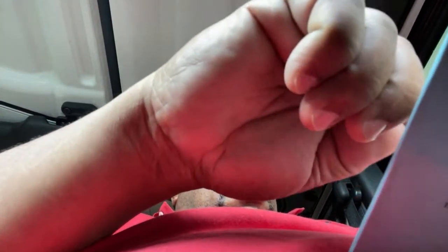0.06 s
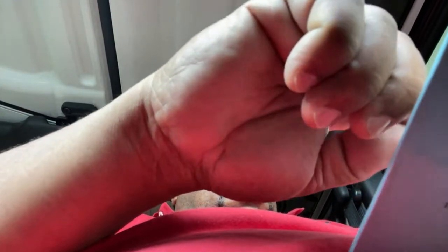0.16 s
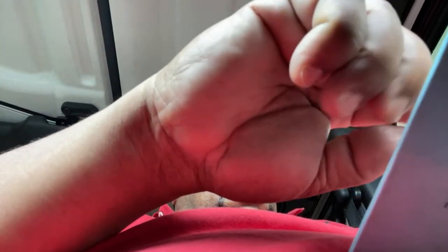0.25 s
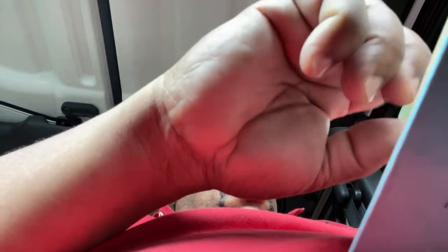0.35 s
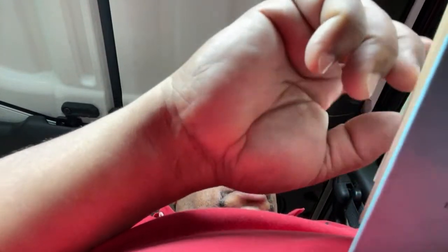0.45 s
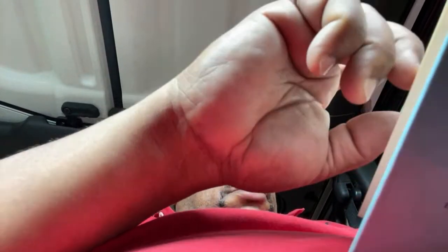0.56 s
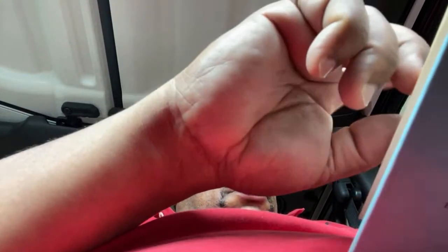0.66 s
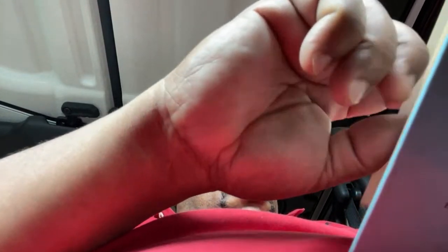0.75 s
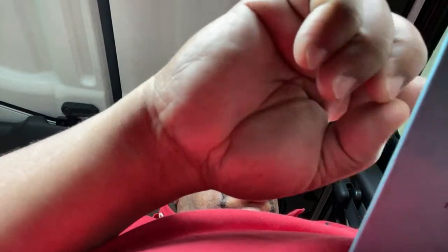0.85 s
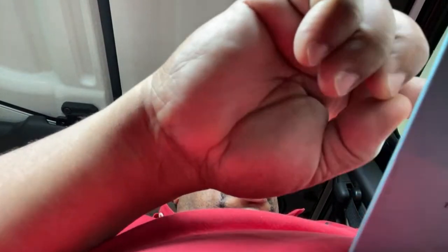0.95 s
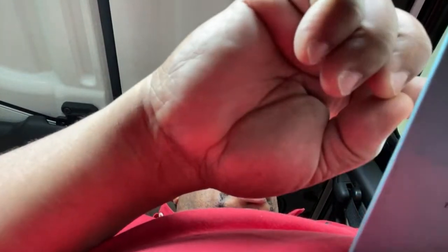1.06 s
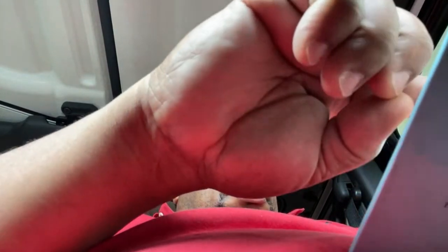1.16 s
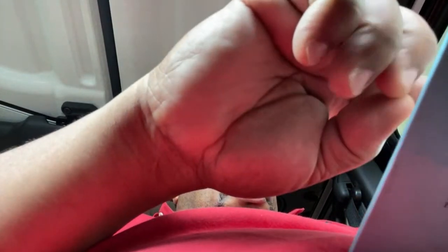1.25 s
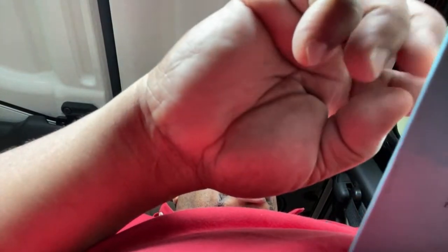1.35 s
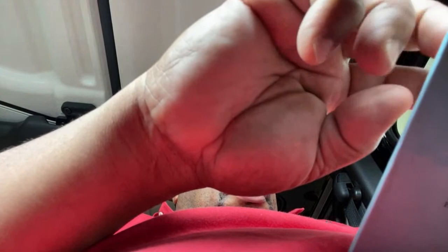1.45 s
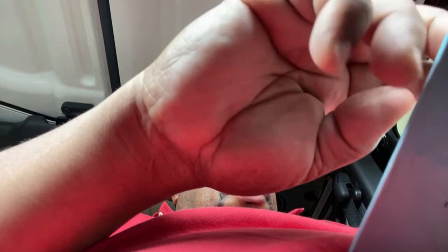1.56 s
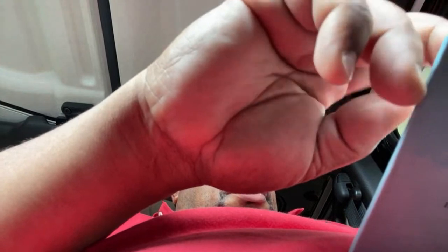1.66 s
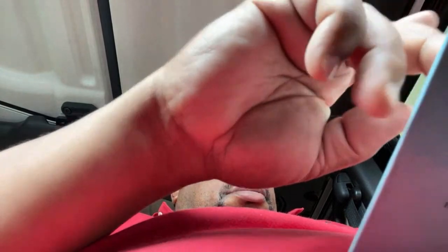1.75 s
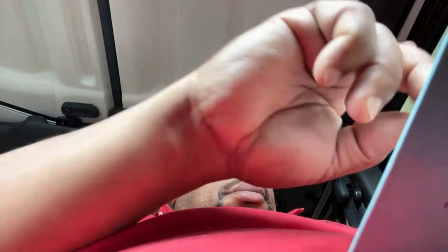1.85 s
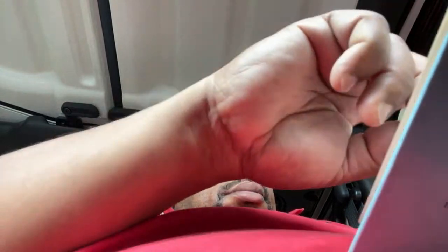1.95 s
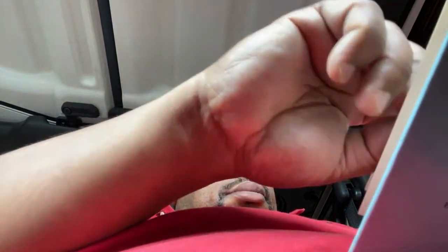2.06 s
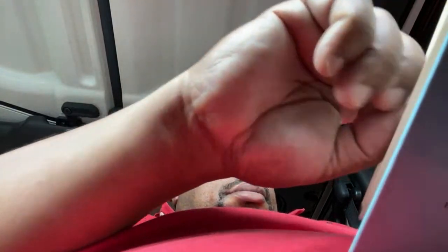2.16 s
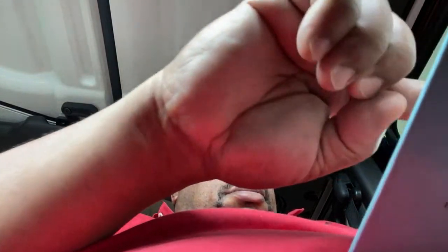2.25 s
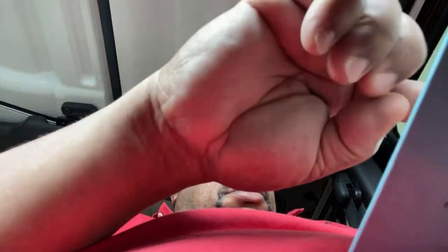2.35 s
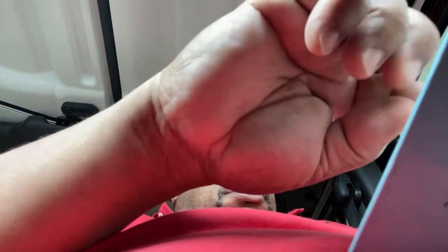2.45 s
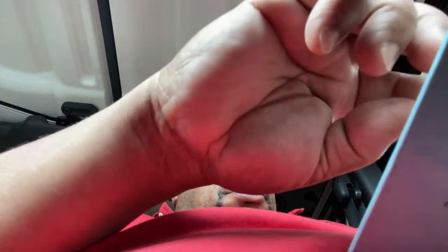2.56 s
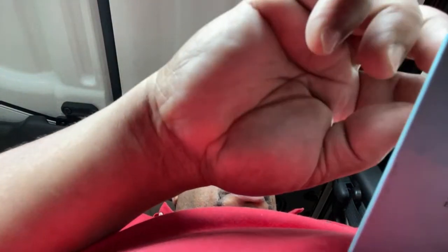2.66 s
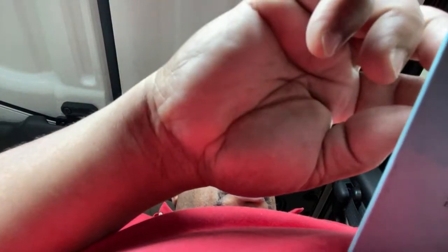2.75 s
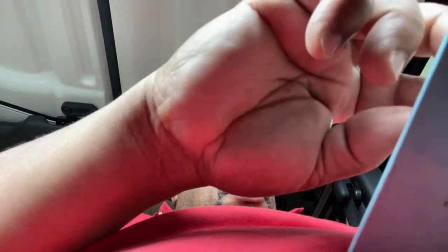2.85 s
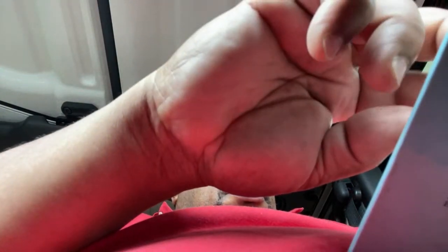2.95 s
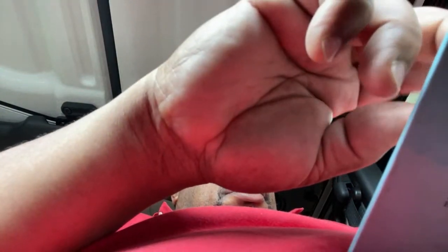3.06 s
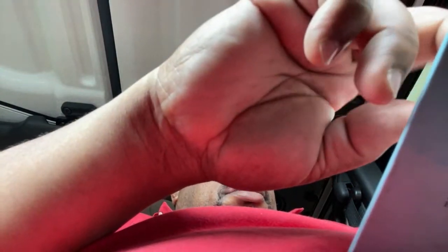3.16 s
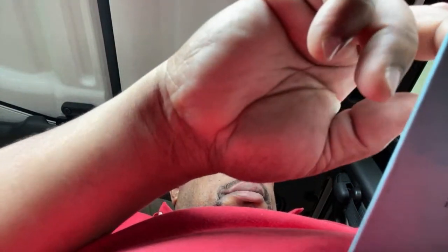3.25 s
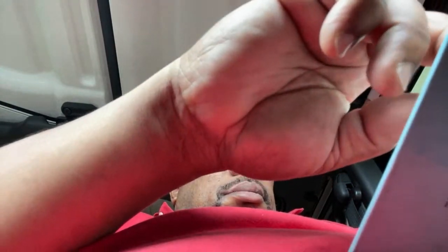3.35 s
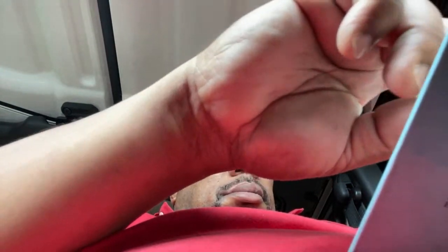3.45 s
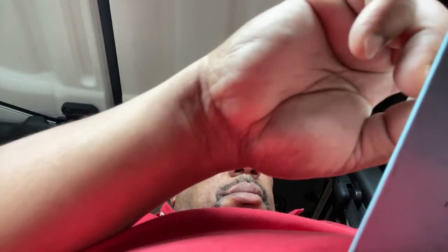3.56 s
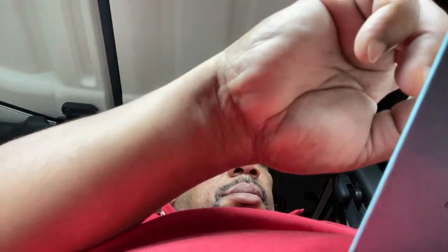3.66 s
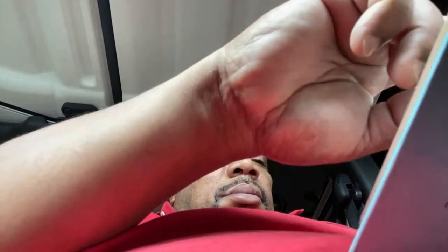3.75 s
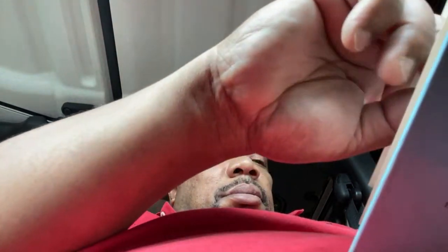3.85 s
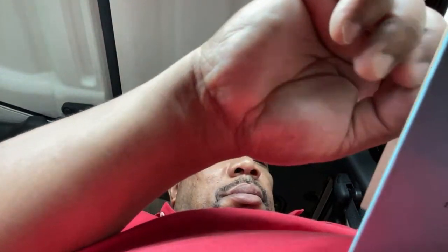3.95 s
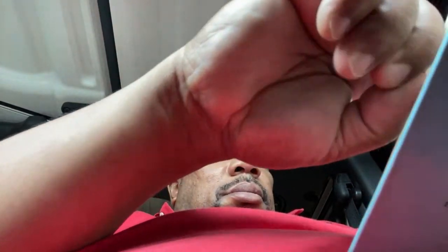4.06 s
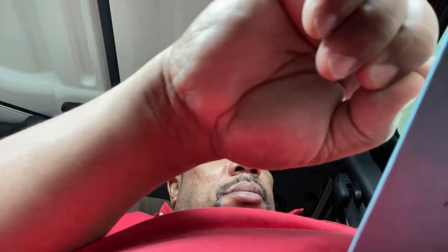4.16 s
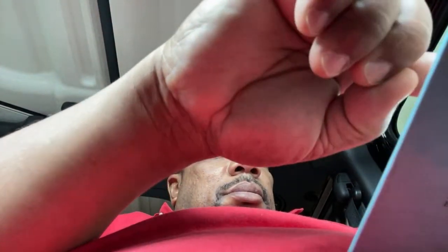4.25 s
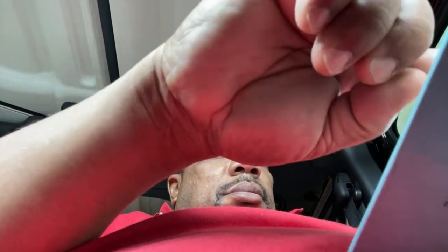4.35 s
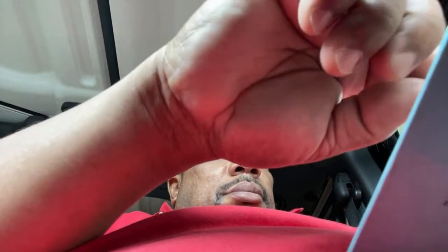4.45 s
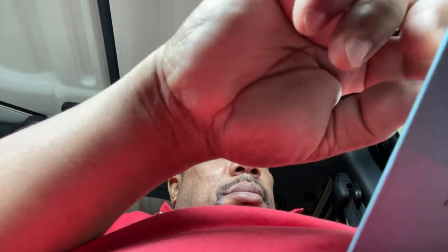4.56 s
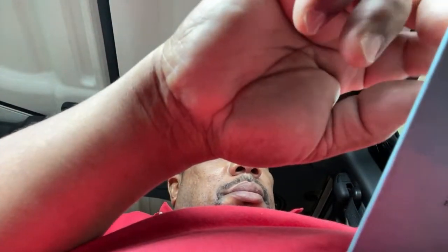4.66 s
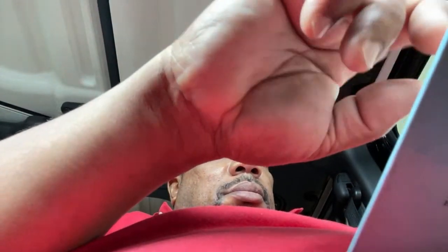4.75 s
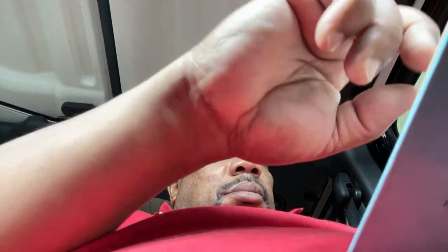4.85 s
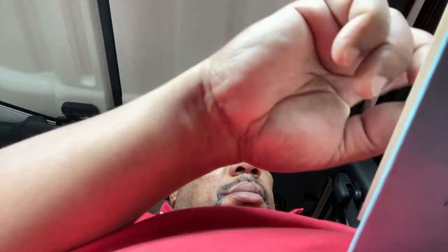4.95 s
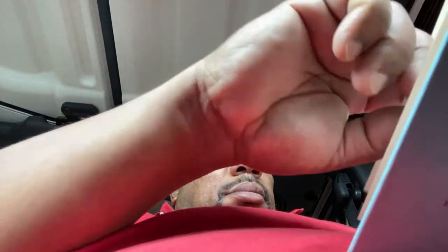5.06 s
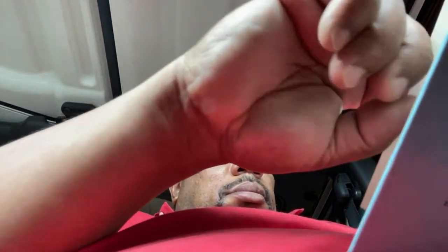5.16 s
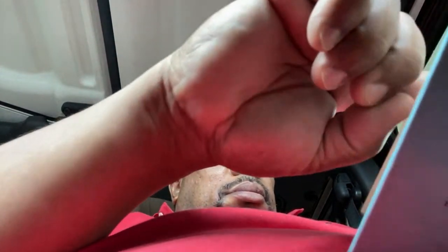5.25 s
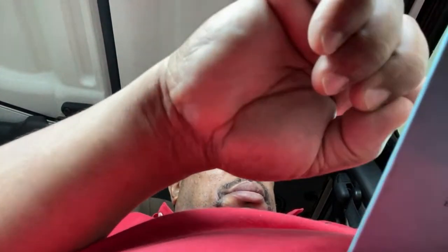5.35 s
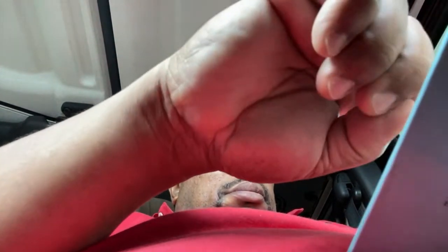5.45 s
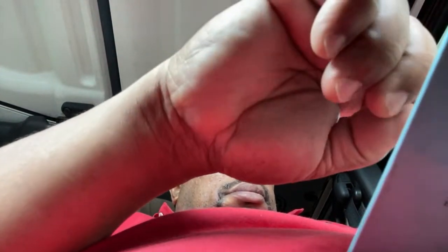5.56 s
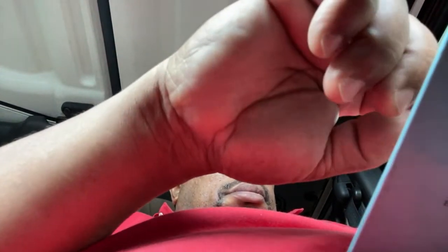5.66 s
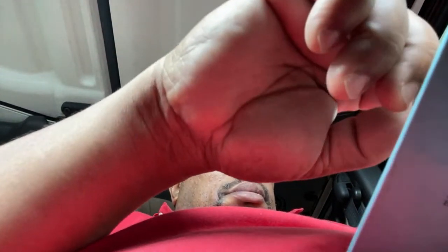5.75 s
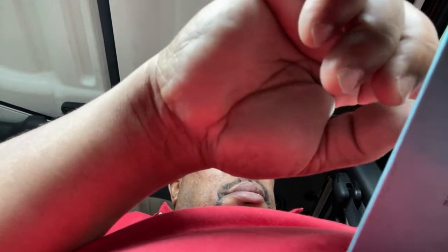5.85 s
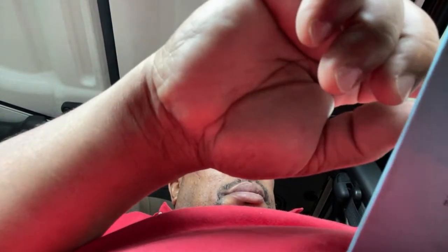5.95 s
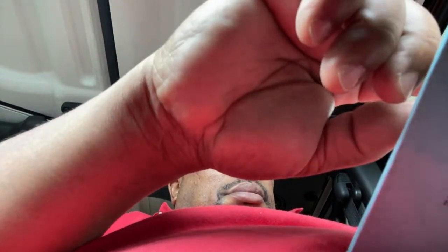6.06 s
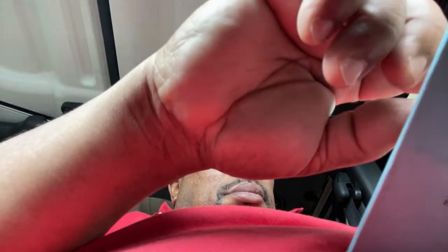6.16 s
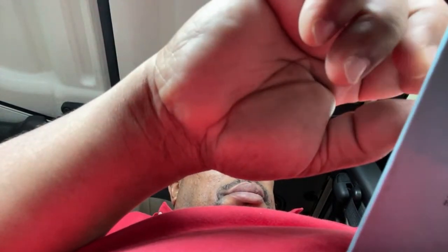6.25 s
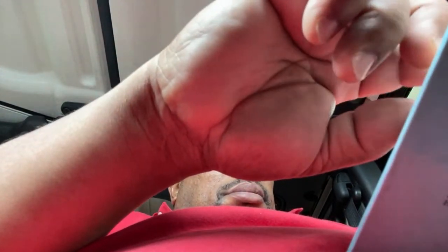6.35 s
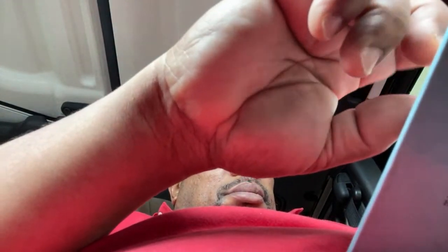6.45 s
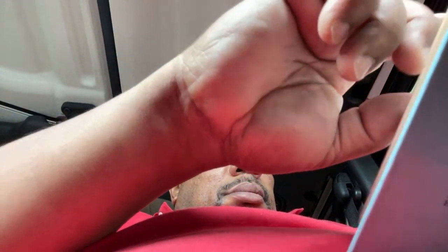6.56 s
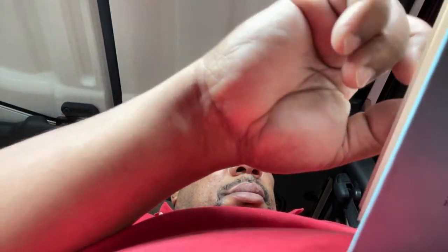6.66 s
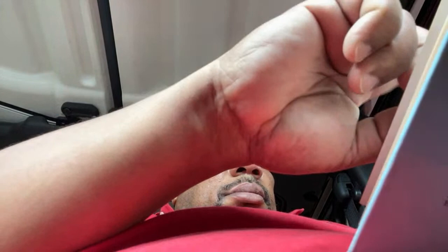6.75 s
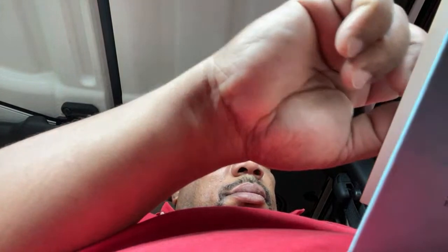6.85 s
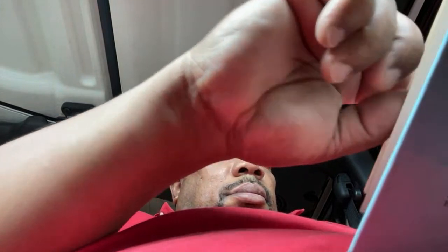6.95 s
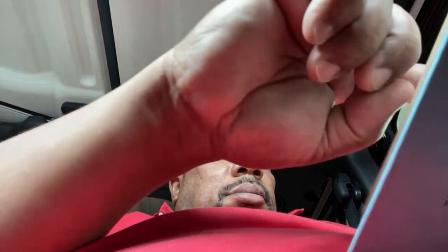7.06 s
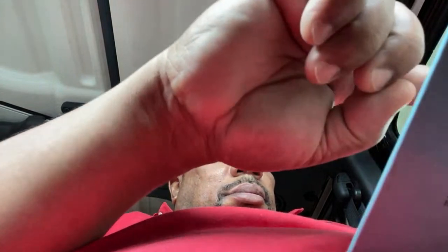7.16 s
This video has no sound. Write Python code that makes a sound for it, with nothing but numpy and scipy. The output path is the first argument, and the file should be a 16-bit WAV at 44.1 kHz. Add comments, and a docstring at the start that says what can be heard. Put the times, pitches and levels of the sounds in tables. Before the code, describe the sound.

A fingertip taps a tablet screen in a few short, sharp clicks inside a vehicle, over a faint steady fan hum.

```python
"""Cab of a standing vehicle: a fingertip taps a tablet close to the microphone.
Each tap is a quick cluster of flesh knocks and nail clicks that ring the glass and case. Skin rubs
on the glass at the firm taps. Soft, dull low thuds and bumps sound close to the microphone.
The cab returns a few echoes and a short tail over the steady hum of its fan."""
import sys
import numpy as np
from scipy import signal
from scipy.fft import rfft, irfft
from scipy.io import wavfile
from scipy.ndimage import uniform_filter1d

SR = 44100
rng = np.random.default_rng(int(sys.argv[2]) if len(sys.argv) > 2 else 0)


def waveform_to_disk(signal):
    """Save audio, clipped to [-1, 1], as 16-bit WAV at the path in sys.argv[1]."""
    frames = np.transpose(np.atleast_2d(signal))
    scaled = np.clip(frames, -1, 1) * 32767
    samples = np.round(scaled).astype(np.int16)
    wavfile.write(sys.argv[1], SR, samples)


N = 317017

# Each row: start in seconds, knock level in dB, knock pitch in Hz, contact length in seconds, nail clack
# in dB, nail tick in dB, landing skip count, first bounce gap in seconds, first bounce in dB re the blow.
TAPS = [(2.081, -8, 1235, 0.00415, -17.5, -12.5, 0, .0086, -13),
        (2.1067, -29, 1420, .003, -34.5, -48, 0, .004, -18),
        (3.8814, -30.5, 1214, .0077, -46, -55, 0, 0.0063, -8),
        (3.8992, -21, 1150, .0042, -31, -37, 1, .0158, -3.5),
        (3.9404, -28, 1110, 0.0051, -53, -50, 0, .007, -5),
        (5.0938, -18.5, 1160, 0.00392, -42, -26, 2, .0088, -11.5),
        (6.911, -37, 1198, 0.0099, -47, -50, 0, 0.0049, 0)]
# Each row: frequency in Hz, gain in dB, swell time in seconds.
NAIL_MODES = [(2156, 1.5, 0.00037), (2570, -10, 0.00025), (3500, 2, 0.00022), (4950, -0.5, 0.00065),
              (5230, -6, 0.0005), (5960, -4.5, 0.00061), (7970, -8.5, .0003)]
# Each row: frequency in Hz, gain in dB, T60 in seconds.
TABLET_MODES = [(1093, 4, 0.077), (1380, -11, 0.046), (1504, -3.5, 0.044), (1790, -13, 0.054),
                (2000, -7, .05), (2170, -18, 0.1), (2220, -3, .05), (3110, 2, 0.04), (3170, 5, 0.034),
                (3300, -4, .055), (5010, -2, 0.026), (5180, 4, 0.054), (6030, -10, .045)]
# Rubs under firm taps. Each row: start in seconds, length in seconds, crackle in dB, squeak in dB,
# crackle tilt in dB per octave.
SCUFFS = [(2.08, 0.021, -26, -37, 0.5), (3.8952, 0.035, -26.5, -31.5, 4.5), (5.086, 0.036, -32, -51, 0)]
# Rubs before or after a tap. Each row: start in seconds, length in seconds, squeak in dB,
# starting pitch in Hz, crackle in dB.
SLIDES = [(2.047, 0.019, -43.5, 2130, -52.5), (2.066, 0.016, -35, 2360, -38.5),
          (3.944, .021, -40, 1100, -62), (3.947, 0.02, -40, 1980, -58)]
# Colour of the skin crackle; bass cut of all rubs. Each row: frequency in Hz, gain in dB.
CRACKLE_SPECTRUM = [(600, -25), (1100, 11.5), (1700, -14), (2400, 6), (3700, -1), (4700, 6.5), (5600, -3),
                    (6900, 1.5), (9000, -10.5)]
RUB_LOW_CUT = [(100, -29), (600, 0)]
# Soft low thuds. Each row: start in seconds, level in dB, centre pitch in Hz.
THUDS = [(0.557, -50, 225), (1.178, -45.5, 181), (1.806, -54, 154), (2.078, -49, 92), (2.527, -58, 170),
         (2.731, -55.5, 142), (4.5, -58, 208), (5.008, -54, 181), (6.145, -51, 193), (6.569, -53.5, 188),
         (6.767, -55, 185)]
# Hand shifts. Each row: start in seconds, level in dB.
TICKS = [(.39, -55), (2.187, -59), (2.234, -57.5), (2.514, -54.5), (4.206, -55.5), (4.367, -56),
         (5.621, -51)]
# Nearby hard surfaces. Each row: delay in seconds, gain in dB.
CAB_ECHOES = [(.00792, -30), (0.014, -25.5), (0.027, -30)]
# Each row: frequency in Hz, gain in dB.
CAB_TAIL_SPECTRUM = [(300, -13), (1200, -14.5), (2400, -10.5), (5000, -16.5), (8000, 1)]
# Each row: frequency in Hz, T60 in seconds.
CAB_TAIL_T60 = [(300, .11), (1200, 0.068), (2500, 0.11), (5000, 0.073), (8000, 0.022)]
# Fan air. Each row: frequency in Hz, relative spectral density in dB.
AIR_SPECTRUM = [(25, -27), (60, -24.5), (100, -19), (160, -13.5), (278, -13), (302, 0.5), (420, -0.5),
                (640, -2.5), (900, -6.5), (1350, -13.5), (1900, -12), (2600, -18), (3100, -15.5),
                (3800, -21), (4900, -17), (6800, -23.5), (8200, -28)]
# Cab resonances under the fan. Each row: centre in Hz, width in Hz, lift in dB.
HUM_RESONANCES = [(325.7, 44, 5.6), (522, 42, 2.5), (645, 60, 3.7), (826, 56, 5.64), (1020, 56, 0.84),
                  (1656, 130, 3.5), (3370, 82, 1.8), (6520, 610, 4.5)]
# Each row: frequency in Hz, gain in dB.
MIC_RESPONSE = [(25, -19), (70, -0.5), (6700, 0), (7400, -7.5), (8000, -18.5), (8800, -25.5), (9800, -44),
                (12000, -47), (15000, -56)]


def taps(nail_delay_s=0.001642, clack_hz=3600, tick_hz=4600):
    """Fingertip flesh gives a short pitched knock; the nail clicks just after."""
    out, t = np.zeros(N), np.arange(SR // 50) / SR
    nail_t = t - nail_delay_s
    for start_s, knock_db, knock_hz, length_s, clack_db, tick_db in contacts():
        press = np.sin(np.pi * np.clip(t / length_s, 0, 1)) ** 2
        knock = gain_of(knock_db) * press * np.sin(2 * np.pi * knock_hz * (t - length_s / 2))
        force = [(clack_hz, clack_db), (tick_hz, tick_db)]
        nail = sum(gain_of(db + value_at(force, hz)) * swell(nail_t, swell_s)
                   * np.sin(2 * np.pi * hz * nail_t) for hz, db, swell_s in NAIL_MODES)
        add(out, start_s, knock + nail)
    return out


def contacts(skip_s=.0042, skip_db=-8.5, skip_step_db=-1.5, bounces=3, gap_ratio=.6, bounce_step_db=-3):
    """Contacts of each tap: any growing skips, the blow, then quickening, fading bounces."""
    for start_s, knock_db, hz, length_s, clack_db, tick_db, skips, gap_s, bounce_db in TAPS:
        for k in range(skips):  # counted back from the blow
            db = skip_db + k * skip_step_db
            yield start_s - (k + 1) * skip_s, knock_db + db, hz, length_s, clack_db + db, tick_db + db
        yield start_s, knock_db, hz, length_s, clack_db, tick_db
        bounce_hz, bounce_length_s = hz * 1.11, length_s * 0.69
        for k, delay_s in enumerate(np.cumsum(gap_s * gap_ratio ** np.arange(bounces))):
            db = bounce_db + k * bounce_step_db
            nail_db = db - 1.5  # less nail in a bounce
            yield (start_s + delay_s, knock_db + db, bounce_hz, bounce_length_s,
                   clack_db + nail_db, tick_db + nail_db)


def tablet(drive):
    """Glass and case ring briefly at their modes."""
    t, ring = np.arange(SR // 8) / SR, 0
    for hz, db, t60_s in TABLET_MODES:
        decay = gain_of(-60 * t / t60_s)
        ring = ring + gain_of(db) * 2 * decay / decay.sum() * np.cos(2 * np.pi * hz * t)
    return signal.fftconvolve(drive, ring)[:N]


def rubs(scuff_hz=2120):
    """Scuffs press early and squeak hoarsely; slides press evenly, with a clearer, rising squeak."""
    out = np.zeros(N)
    for start_s, length_s, crackle_db, squeak_db, tilt_db in SCUFFS:
        scuff = stick_slip(length_s, squeak_db, scuff_hz, crackle_db,
                           fall=2.7, width_hz=1000, db_per_octave=tilt_db)
        add(out, start_s, scuff)
    for start_s, *slide in SLIDES:
        add(out, start_s, stick_slip(*slide, fall=.8, width_hz=580, glide=.2))
    return coloured(out, RUB_LOW_CUT)


def stick_slip(length_s, squeak_db, start_hz, crackle_db, fall, width_hz,
               glide=0, db_per_octave=0, slips_per_s=5500, rise=0.67):
    """Skin sticks and slips on glass: a dry crackle and a squeak."""
    progress = np.linspace(0, 1, round(length_s * SR))
    chance, size = rng.random((2, SR // 10))[:, :len(progress)]
    pressure = progress ** rise * (1 - progress) ** fall
    slips = (chance < slips_per_s / SR) * (size - .5)
    hz = start_hz * (1 + glide * progress)
    squeak = resonate(resonate(slips, hz, width_hz), hz, width_hz)
    crackle = coloured(slips, [(f, db + db_per_octave * np.log2(f)) for f, db in CRACKLE_SPECTRUM])
    friction = gain_of(squeak_db) * unit_rms(squeak) + gain_of(crackle_db) * unit_rms(crackle)
    return friction * pressure / pressure.max()


def thuds(swell_s=0.0034, settle_s=0.012, sink_depth=0.42, roughness=0.61, width_hz=170,
          bump_db=-63, bump_count=18):
    """Soft, dull thuds close to the microphone, each a rough, sinking note; fainter bumps at random."""
    out, t = np.zeros(N), np.arange(SR // 10) / SR
    bumps = [(when * (N - len(t)) / SR, bump_db, 140 + 120 * pitch)
             for when, pitch in rng.random((bump_count, 2))]
    sink = 1 + sink_depth * (2 * np.exp(-t / settle_s) - 1)
    for start_s, db, hz in THUDS + bumps:
        note = np.sin(2 * np.pi * np.cumsum(hz * sink) / SR)
        noise = rng.standard_normal(len(t))
        rumble = unit_rms(resonate(resonate(noise, hz, width_hz), hz, width_hz))
        add(out, start_s, gain_of(db) * swell(t, swell_s) * (note + roughness * rumble))
    return out


def ticks(hz=6800, width_hz=2200, rise_s=0.004):
    """Tiny bursts of high crackle as the hand shifts."""
    out, t = np.zeros(N), np.arange(SR // 25) / SR
    burst = t / rise_s * np.exp(1 - t / rise_s)
    for start_s, db in TICKS:
        crackle = unit_rms(resonate(rng.standard_normal(len(t)), hz, width_hz))
        add(out, start_s, gain_of(db) * burst * crackle)
    return out


def cab(direct, onset_s=.003, density=.1):
    """Direct sound, a few distinct echoes and a short tail that dies band by band."""
    t = np.arange(SR // 4) / SR
    scatter = rng.choice([-1., 1.], len(t)) * (rng.random(len(t)) < density) * (t > onset_s)
    hz, frame_s, bands = signal.stft(scatter, SR, nperseg=128)
    decay = gain_of(-60 * frame_s / value_at(CAB_TAIL_T60, hz)[:, None])
    tail = signal.istft(bands * decay, SR)[1]
    response = coloured(tail / np.linalg.norm(tail), CAB_TAIL_SPECTRUM)
    response[0] += 1
    for delay_s, db in CAB_ECHOES:
        add(response, delay_s, gain_of([db]))
    return signal.fftconvolve(direct, response)[:N]


def fan(level_db=-51.5, waver_db=0.36, drift_samples=4000):
    """Moving air, lifted by the cab resonances, wavering slightly in level."""
    hz = np.fft.rfftfreq(N, 1 / SR)
    lift_db = sum(db * np.exp(-2 * ((hz - centre_hz) / width_hz) ** 2)
                  for centre_hz, width_hz, db in HUM_RESONANCES)
    air = irfft(rfft(rng.standard_normal(N)) * gain_of(value_at(AIR_SPECTRUM, hz) + lift_db), N)
    drift = uniform_filter1d(rng.standard_normal(N), drift_samples)
    drift = unit_rms(uniform_filter1d(drift, drift_samples))
    return gain_of(level_db + waver_db * drift) * unit_rms(air)


def gain_of(db):
    """Decibels to amplitude."""
    return 10 ** (np.asarray(db) / 20)


def unit_rms(x):
    """Scales to an rms of one."""
    return x / np.sqrt(np.mean(x ** 2) + 1e-20)


def value_at(points, hz):
    """Interpolates (Hz, value) rows over log frequency."""
    points_hz, values = np.transpose(points)
    return np.interp(np.log(hz + 1), np.log(points_hz + 1), values)


def add(mix, start_s, sound):
    """Adds a sound to the mix in place."""
    part = mix[round(start_s * SR):][:len(sound)]
    part += sound[:len(part)]


def coloured(x, spectrum):
    """Filters by (Hz, dB) rows."""
    hz = np.fft.rfftfreq(len(x), 1 / SR)
    return irfft(rfft(x) * gain_of(value_at(spectrum, hz)), len(x))


def resonate(x, hz, width_hz):
    """Unity-gain resonance; hz may be a curve."""
    carrier = np.exp(2j * np.pi * np.cumsum(hz * np.ones(len(x))) / SR)
    pole = np.exp(-np.pi * width_hz / SR)
    return 2 * (carrier * signal.lfilter([1 - pole], [1, -pole], x / carrier)).real


def swell(t, swell_s):
    """Peaks at one after twice swell_s, then decays."""
    age = np.maximum(t, 0) / swell_s
    return (age / 2) ** 2 * np.exp(2 - age)


def scene(rub_coupling_db=-7):
    """Hand on tablet in the humming cab; a rub shakes the tablet less than a blow."""
    blows, skin = taps(), rubs()
    ringing = tablet(blows + gain_of(rub_coupling_db) * skin)
    return (cab(blows + skin + ringing + ticks()) + thuds() + fan())[None]


def record(dry, hiss_db=-93.5, cutoff_hz=15650):
    """The microphone loses deep bass and top treble; faint recorder hiss and a low-pass follow."""
    low_pass = signal.firwin(511, cutoff_hz, window=("kaiser", 9), fs=SR)
    heard = coloured(dry[0], MIC_RESPONSE) + gain_of(hiss_db) * rng.standard_normal(N)
    return signal.oaconvolve(heard, low_pass, "same")[None]


dry = scene()
out = record(dry)
waveform_to_disk(out)
```